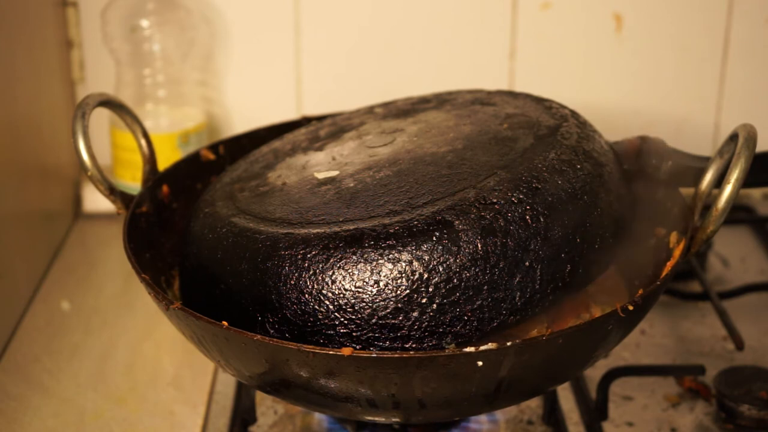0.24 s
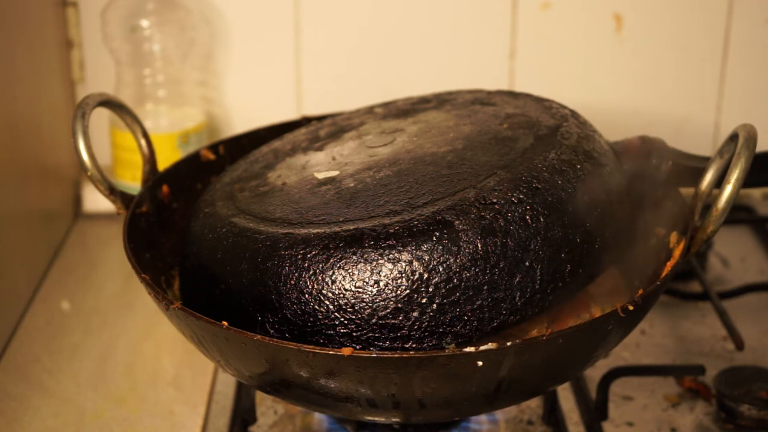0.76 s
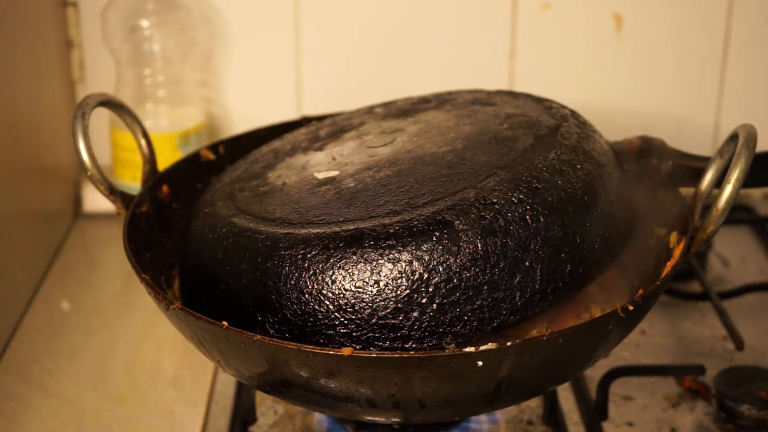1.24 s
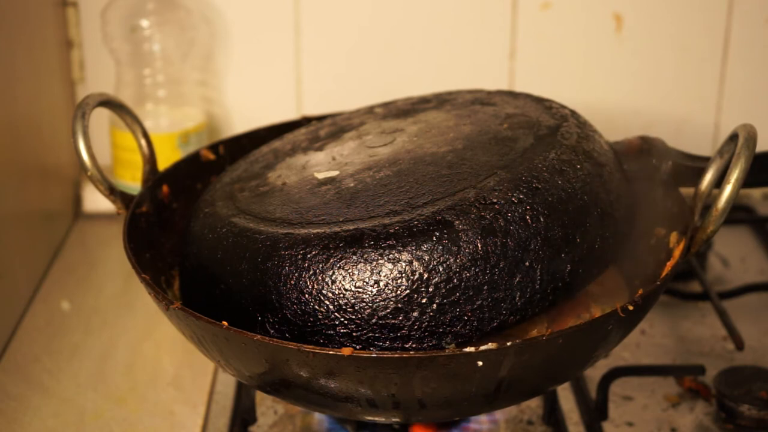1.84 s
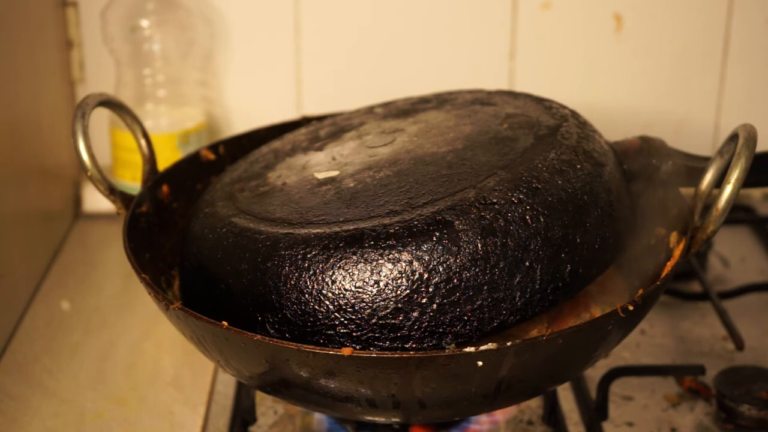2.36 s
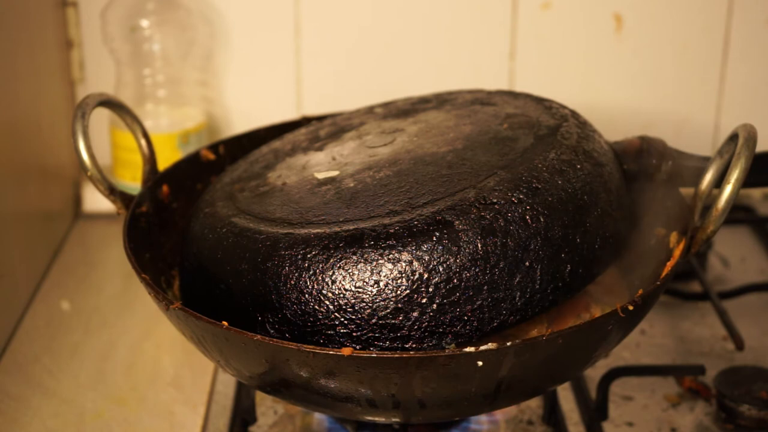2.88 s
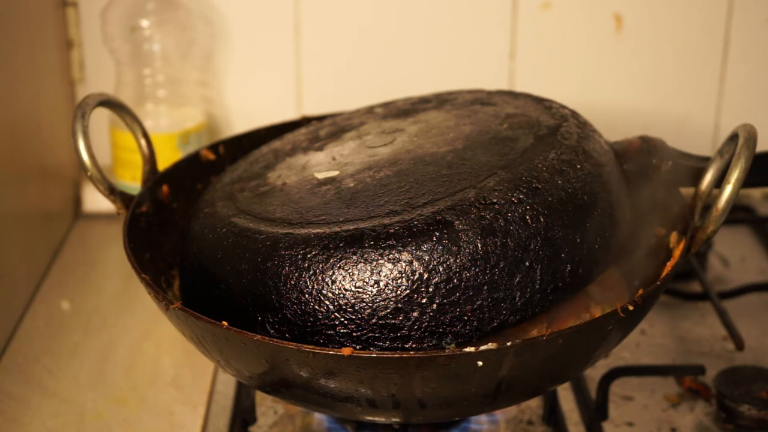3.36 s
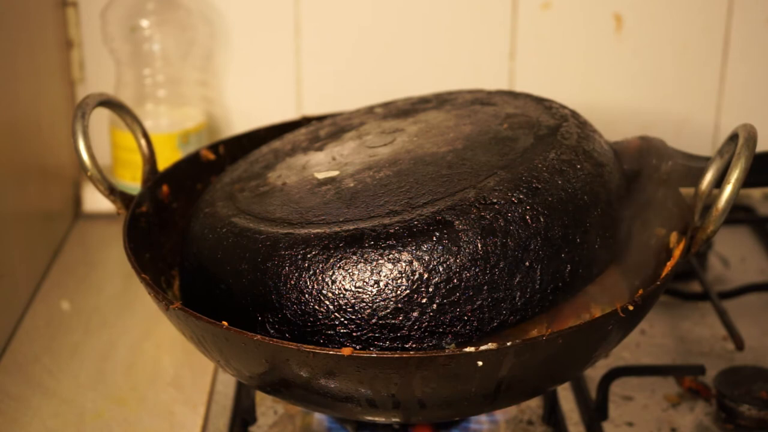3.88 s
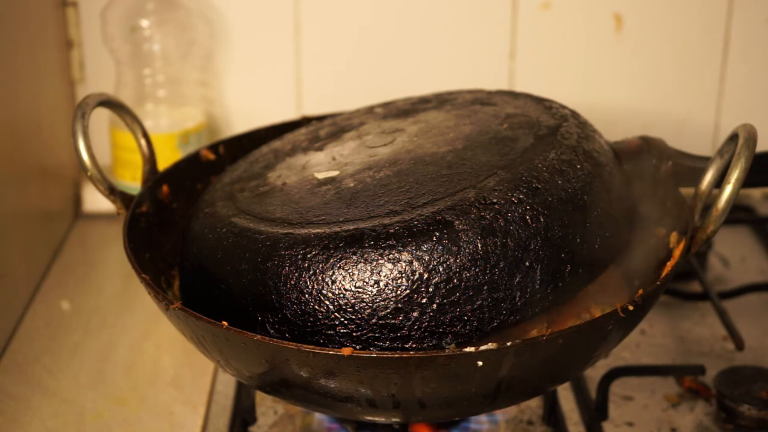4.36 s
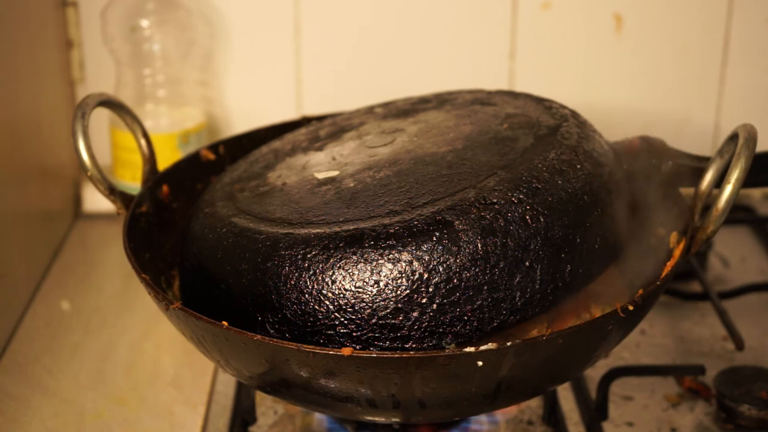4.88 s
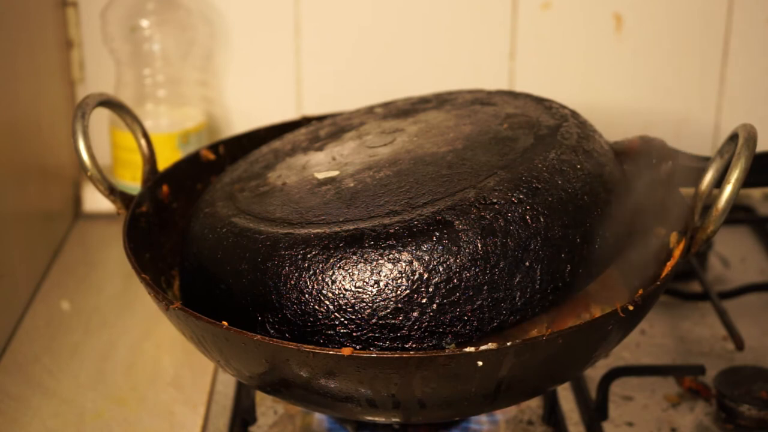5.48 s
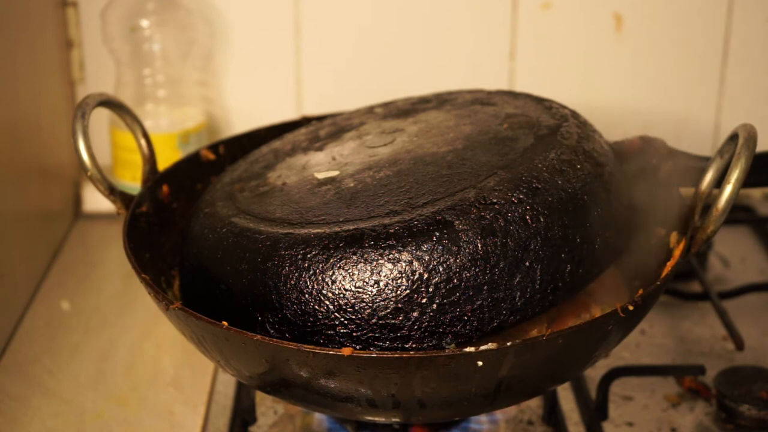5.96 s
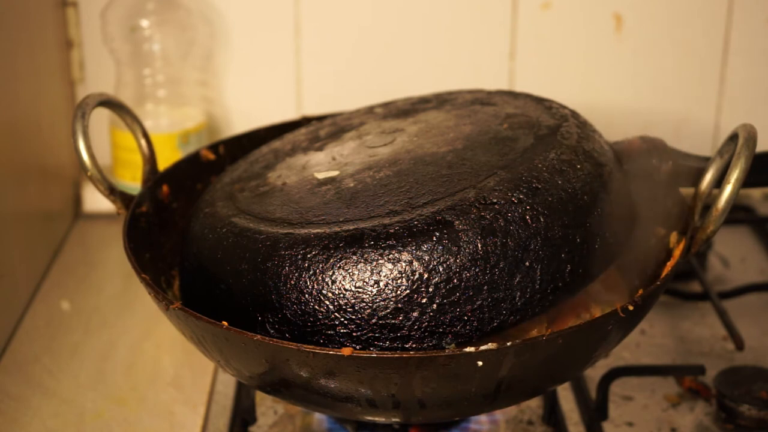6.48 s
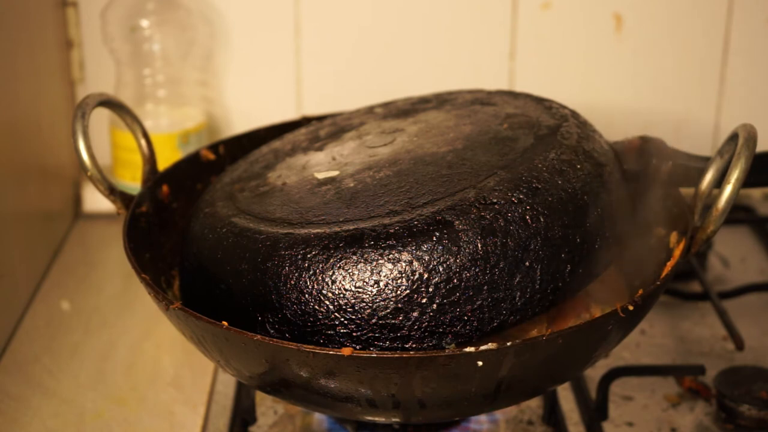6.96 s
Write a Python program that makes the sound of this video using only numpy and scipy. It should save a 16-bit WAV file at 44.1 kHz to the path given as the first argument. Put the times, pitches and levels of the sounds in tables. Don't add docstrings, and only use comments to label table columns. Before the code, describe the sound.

Food simmers and sizzles under a cover in a steel pan, with low hollow drumming, sharp chirping fat pops and a steady gas burner hiss.

```python
import sys
import numpy as np
from scipy import signal
from scipy.fft import rfft, irfft, next_fast_len
from scipy.io import wavfile
from scipy.ndimage import uniform_filter1d, map_coordinates

SR = 44100
rng = np.random.default_rng(int(sys.argv[2]) if len(sys.argv) > 2 else 0)


def volts_from_decibels(level):
    exponent = np.asarray(level, float) / 20
    return 10 ** exponent


def master(y):
    cut = np.clip(np.atleast_2d(y).T, -1, 1)
    pcm = np.round(cut * 32767)
    wavfile.write(sys.argv[1], SR, pcm.astype(np.int16))


N = 318843


def unit(x):
    return x / np.sqrt(np.mean(x ** 2) + 1e-20)


def along(points, hz):
    point_hz, value = np.transpose(points)
    return np.interp(np.log(hz + 1), np.log(point_hz + 1), value)


def envelope(rows):
    s, db = np.transpose(rows)
    return np.interp(np.arange(N) / SR, s, db)


def wobble(rate):
    knots = rng.standard_normal(int(N * rate / SR) + 4)
    return map_coordinates(knots, [np.arange(N) * rate / SR])


def filtered(x, response):
    m = next_fast_len(N + 8192)
    return irfft(rfft(x, m) * response(np.fft.rfftfreq(m, 1 / SR)), m)[..., :N]


def humps(modes, hz):
    return sum(volts_from_decibels(db) ** 2 / (1 + ((hz - center) / width) ** 2) ** 2 for center, width, db in modes)


def rush(power, patchy_db):
    # frequency in Hz, correlation coefficient.
    likeness = [(50, .9995), (150, .993), (430, .996), (640, .84), (1400, .8), (3100, .62), (6800, .5),
                (15000, .44)]
    z = signal.stft(rng.standard_normal((2, N)), nperseg=512)[2]
    field = uniform_filter1d(rng.standard_normal(z.shape[1:]), 5, 0)
    field = uniform_filter1d(field, 6, 1)
    pair = signal.istft(z * volts_from_decibels(patchy_db * unit(field)), nperseg=512)[1][:, :N]

    def split(hz):
        angle = np.arccos(np.clip(along(likeness, hz), -1, 1)) / 2
        return np.sqrt(power(hz)) * [np.cos(angle), np.sin(angle)]

    mid, side = filtered(pair, split)
    return unit(np.array([mid + side, mid - side]))


def chirps(s, db, hz, cycles):
    life = cycles / hz
    t = np.arange(int(6 * life.max() * SR)) / SR
    age = t / life[:, None]
    swell = (age * np.exp(1 - age)) ** 2
    ring = np.sin(2 * np.pi * hz[:, None] * t * (1 + 0.0074 * age))
    wave = volts_from_decibels(db)[:, None] * swell * ring
    first = np.clip(np.round(s * SR).astype(int), 0, N)
    at = first[:, None] + np.arange(len(t))
    return np.bincount(at.ravel(), wave.ravel(), N + len(t) + 1)[:N]


def simmer():
    # time in seconds, level in dB.
    vigour = [(0.0, -39.5), (0.16, -45), (0.36, -44), (0.86, -42), (1.75, -46), (2.39, -40), (2.78, -42.5),
              (4.25, -42.5), (4.37, -43.5), (4.75, -42), (6.14, -44), (7.23, -43)]
    # resonance in Hz, width in Hz, level in dB.
    trapped_air = [(197, 10.6, -11), (252, 8.7, -13), (327, 16, -3.5), (351, 8.3, -0.5), (367, 19, 1.5),
                   (398.1, 17.2, 2), (435, 15, -17), (450, 45, -15.5)]
    # resonance in Hz, width in Hz, level in dB.
    rim_modes = [(871, 28, -2.5), (909, 13, 2.5), (962, 24, -3.5)]
    # resonance in Hz, width in Hz, level in dB.
    wall_modes = [(1253, 53, 1.5), (1360, 37, -0.5), (1379, 39, 3), (1453, 32, -0.5), (1584, 62, -1.5),
                  (1785, 200, -9.5), (2030, 33, -6.5), (2100, 52, -9.5), (2310, 32, -6), (2600, 23, -11),
                  (3100, 53, -8.5), (3520, 97, -11)]
    # frequency in Hz, level in dB per Hz.
    stew = [(150, -33), (230, -3.5), (600, -9.5), (1100, -8), (2400, -18.5), (3800, -24.5), (6000, -60)]
    # time in seconds, peak in dB, pitch in Hz.
    heaves = [(0.03, -27.5, 380), (0.322, -29.5, 363), (1.391, -32, 380), (2.78, -30, 350),
              (4.775, -28, 374), (7.06, -23.5, 371), (4.812, -29.5, 379), (6.975, -31, 375),
              (0.598, -30, 368), (0.781, -32, 374), (2.06, -47, 367), (2.135, -24, 383),
              (2.362, -24.5, 378), (2.412, -24.5, 367), (2.544, -38, 373), (2.731, -27, 381),
              (3.152, -33.5, 399), (3.495, -27.5, 351), (3.569, -29.5, 370), (3.646, -23, 375),
              (4.56, -39, 369), (4.897, -34, 398), (5.354, -31, 391), (5.996, -25.5, 382),
              (6.156, -28.5, 340), (6.207, -26.5, 350.5), (6.397, -35, 386), (6.531, -27.5, 367),
              (6.573, -29, 349), (6.651, -22, 365)]
    boil_db = envelope(vigour)
    swing_db = boil_db - boil_db.mean()
    drum_db = boil_db + 2.34 + 0.74 * wobble(14)
    rim_db = -50.5 + 0.34 * swing_db + 0.79 * wobble(8.3)
    wall_db = -42.5 + 0.19 * swing_db + 1.17 * wobble(24)
    drum = volts_from_decibels(drum_db) * rush(lambda hz: humps(trapped_air, hz), patchy_db=-0.7)
    rim = volts_from_decibels(rim_db) * rush(lambda hz: humps(rim_modes, hz), patchy_db=2.8)
    wall = volts_from_decibels(wall_db) * rush(lambda hz: humps(wall_modes, hz) + volts_from_decibels(along(stew, hz)) ** 2, patchy_db=1.18)
    s, db, hz = np.transpose(heaves)
    return drum + rim + wall + chirps(s - .003, db - 3.0, hz, cycles=3.87)


def burner():
    # time in seconds, level in dB.
    flutter = [
        (0, -58),
        (1.35, -60),
        (2.5, -64),
        (2.7, -60),
        (3.45, -54),
        (3.8, -59),
        (5.6, -59),
        (6.5, -58),
        (7.23, -46),
    ]
    # frequency in Hz, level in dB per Hz.
    flutter_spectrum = [(15, -43), (25, -14), (33, -4), (45, 10), (56, -6), (75, -39.5)]
    # frequency in Hz, level in dB per Hz.
    roar_spectrum = [(35, -36), (60, 0.5), (102, -2.5), (125, -8.5), (200, -11), (270, -23), (330, -31)]
    # resonance in Hz, width in Hz, level in dB.
    hum_modes = [(143, 13.3, 0)]
    # resonance in Hz, width in Hz, level in dB.
    jet_modes = [(4140, 223, -1.5), (5220, 200, -3), (6920, 180, -8.5), (7080, 350, -15.5),
                 (8670, 76, -9.5), (9800, 380, -12), (10130, 150, -15), (11100, 80, -14),
                 (11460, 180, -13.5), (12500, 120, -14), (12300, 100, -11), (13300, 200, -17),
                 (15000, 160, -34), (15800, 250, -30)]
    # frequency in Hz, level in dB per Hz.
    hiss_spectrum = [(2000, -17.5), (3600, -11.5), (4800, -10), (5900, -15.5), (8100, -18), (10700, -29.5),
                     (12000, -16), (14400, -30), (15700, -22)]
    rumble = rush(lambda hz: volts_from_decibels(along(flutter_spectrum, hz)) ** 2, patchy_db=-3.5)
    rumble = volts_from_decibels(envelope(flutter) - 1.2) * rumble
    roar = volts_from_decibels(-55.0) * rush(lambda hz: volts_from_decibels(along(roar_spectrum, hz)) ** 2, patchy_db=-1.3)
    hum = volts_from_decibels(-52 + 0.3 * wobble(3)) * rush(lambda hz: humps(hum_modes, hz), patchy_db=0.0)
    hiss = rush(lambda hz: humps(jet_modes, hz) + volts_from_decibels(along(hiss_spectrum, hz)) ** 2, patchy_db=0.93)
    return rumble + roar + hum + volts_from_decibels(-49 + 0.49 * wobble(12)) * hiss


def strays(count=40):
    when, size, pitch = rng.random((count, 3)).T
    octaves = 1.1 * pitch ** 2
    return np.transpose([when * N / SR, -44 + 5 * size, 1900 * 2 ** octaves])


def bursts(count=14):
    # time in seconds, peak in dB, pitch in Hz, splash in dB re the peak.
    pops = [(0.004, -28.5, 2800, -8), (0.3479, -19, 2100, -14.5), (0.369, -25.5, 3020, -8),
            (0.4867, -25.5, 3500, -14), (0.7312, -32.5, 2960, -1.5), (1.4046, -32.5, 2140, -5),
            (1.44, -30, 2600, -5), (1.542, -31, 3530, -5), (2.1367, -28, 4040, -4.5),
            (2.57, -19.5, 3360, -13), (2.7796, -32, 2100, -3), (2.917, -33.5, 2080, -2),
            (3.466, -26, 2040, -13), (3.6014, -29, 3370, -11), (3.68, -29.5, 2600, -11),
            (3.734, -24, 3100, -5.5), (4.1973, -31, 1980, -2.5), (4.2287, -28.5, 2000, -14),
            (4.2962, -33, 3100, -2), (4.718, -23.5, 2580, -6), (5.1836, -31, 1890, -5),
            (5.2097, -28.5, 3560, -5), (5.234, -25, 2530, -11), (5.586, -29.5, 2360, -8),
            (5.6228, -24.5, 2030, -15), (5.8214, -31, 2900, -6), (6.0287, -28, 4530, -10),
            (6.0724, -23, 3780, -10), (6.8533, -31.5, 2030, -4), (6.9952, -21.5, 2170, -13)]
    # time in seconds, peak in dB, pitch in Hz.
    spits = [(0.0485, -34, 3000), (0.0887, -35, 2230), (0.6083, -31.5, 2350), (0.7163, -34, 2020),
             (0.773, -34, 2060), (0.8387, -33.5, 2030), (1.061, -37, 2020), (1.881, -33, 2600),
             (1.9879, -33, 2080), (2.175, -33, 2030), (2.3026, -31.5, 2370), (2.4607, -34, 3030),
             (2.4778, -35, 2230), (2.6035, -35, 2070), (3.034, -34, 3520), (3.1387, -33, 1800),
             (3.265, -32, 3000), (3.4945, -35, 1960), (3.8616, -33, 3700), (4.0996, -39, 3570),
             (4.1515, -34, 2000), (5.0686, -32, 1860), (6.33, -34, 1750), (6.3633, -33.5, 3020),
             (6.577, -31.5, 3400), (6.7979, -35, 3080), (6.975, -35, 2600), (7.0646, -32, 3350),
             (7.0908, -35, 2010), (7.1846, -34.5, 2140)]
    # time in seconds, spray in dB, pitch in Hz.
    sprays = [(0.099, -36, 3470), (0.5314, -35, 4060), (1.2086, -34, 3220), (1.483, -36, 4020),
              (1.6082, -31.5, 4340), (1.7295, -33.5, 3210), (2.47, -36, 7000), (2.515, -35, 3300),
              (2.575, -31, 5800), (2.756, -36, 2700), (2.891, -41, 2930), (2.906, -29, 5230),
              (3.3348, -36, 3540), (4.096, -34, 5000), (4.1746, -33, 3420), (4.2, -33.5, 5000),
              (4.377, -37, 3800), (4.4686, -32, 5000), (4.531, -32, 2600), (4.73, -32, 2600),
              (5.084, -41, 3500), (5.46, -32.5, 3630), (5.5444, -35, 5800), (6.248, -39, 5270),
              (6.3, -39, 3000), (6.6682, -33.5, 3550), (6.812, -32.5, 3100), (7.1988, -33.5, 3490)]
    # lowest Hz, highest Hz, level in dB, mean delay in s, dB lost by the smallest.
    droplets = [(1800, 2490, -2, .011, 1), (2600, 4140, 0, .012, 0.5), (4200, 6900, -1, .016, 2.5)]
    small = [(*row, -5.5) for row in [*spits, *strays()]]
    sprayed = [(s, db - 6, hz, 3) for s, db, hz in sprays]
    s, db, hz, splash_db = np.transpose([*pops, *sprayed, *small])
    out = chirps(s - .0004, db - .4, hz, cycles=2.0)
    out += chirps(s + 0.0053, db - 10.5, 0.953 * hz, cycles=2.8)
    for low, high, level_db, delay, small_db in droplets:
        octaves_away = np.abs(np.log2(np.sqrt(low * high) / hz))
        share_db = splash_db - 7.5 * octaves_away
        wait, pitch, size = rng.random((len(s), 3, count)).transpose(1, 0, 2)
        late = .0008 - delay * np.log(1 - .95 * wait)
        loud_db = (db + share_db + level_db)[:, None] - small_db * pitch - 6 * size
        loud_db -= 250 * late
        droplet_hz = low * (high / low) ** pitch
        out += chirps((s[:, None] + late).ravel(), loud_db.ravel(), droplet_hz.ravel(), cycles=2.7)
    return out


def fizz(count=2000):
    when, pitch, size = rng.random((count, 3)).T
    clump_db = 3.3 * wobble(35)[(when * N).astype(int)]
    loud_db = -50.0 + clump_db + 9 * size - 6 * pitch
    return chirps(when * N / SR, loud_db, 1800 * np.exp(1.1 * pitch), cycles=1.48)


def blobs():
    # time in seconds, peak in dB, pitch in Hz.
    large = [(0.327, -39, 820), (0.434, -42, 910), (0.479, -32.5, 950), (0.618, -33.5, 910),
             (0.908, -36.5, 875), (1.208, -36.5, 915), (1.395, -32.5, 894), (2.156, -36, 980),
             (3.686, -33.5, 950), (4.202, -35, 876), (4.288, -37, 880), (4.439, -31.5, 880),
             (4.519, -38, 910), (4.684, -39, 920), (4.808, -34, 866), (5.035, -36, 940), (5.6, -34, 874),
             (6.44, -39, 995), (5.177, -36, 955), (5.82, -44, 885), (5.905, -36, 900), (5.948, -33, 895),
             (5.994, -39, 940), (6.02, -35, 900), (6.224, -32.5, 920), (6.313, -45, 894), (6.484, -37, 900),
             (6.855, -43, 910), (6.945, -47, 910)]
    s, db, hz = np.transpose(large)
    return chirps(s - .001, db - 0.5, hz, cycles=4.0)


def kitchen(x):
    # frequency in Hz, time to fall by 60 dB in seconds.
    room_decay = [(800, 0.14), (3000, 0.22), (9000, 0.13)]
    hz, t, z = signal.stft(rng.standard_normal((2, SR // 3)), SR, nperseg=256)
    fall_db = -60 * t / along(room_decay, hz)[:, None]
    tail = signal.istft(z * volts_from_decibels(fall_db), SR, nperseg=256)[1]
    late = np.pad(x, (130, 0))[None]
    return signal.fftconvolve(late, tail / np.linalg.norm(tail[0]), axes=1)[:, :N]


def ripple(depth_db, width_hz):
    knots = rng.standard_normal(SR // 8)

    def response(hz):
        dense = np.clip(hz / 1000 - 1.5, 0, 1)
        return volts_from_decibels(depth_db * dense * map_coordinates(knots, [hz / width_hz]))

    return response


def scene():
    steady = filtered(simmer() + burner(), ripple(depth_db=2.5, width_hz=22))
    bubbles = bursts() + fizz() + blobs()
    return bubbles + volts_from_decibels(-7) * kitchen(bubbles) + steady


def low_pass(x):
    return signal.sosfilt(signal.butter(12, 15740, fs=SR, output="sos"), x)


def record(dry):
    # frequency in Hz, left minus right in dB.
    balance = [(200, 0), (380, -.8), (700, -1.6), (1290, -2.8), (2380, -2.5), (4400, -.5), (8120, 0),
               (15000, -1.6)]
    knots = rng.standard_normal(SR // 100)
    half = np.array([[.5], [-.5]])

    def response(hz):
        treble = np.clip(hz / 2000 - 1.5, 0, 1)
        skew_rad = 0.64 * treble * map_coordinates(knots, [hz / 694])
        gain = volts_from_decibels(along(balance, hz) * half)
        return gain * np.exp(1j * skew_rad * half) * (hz < 15750)

    return low_pass(filtered(dry, response))


dry = scene()
out = record(dry)
master(out)
```